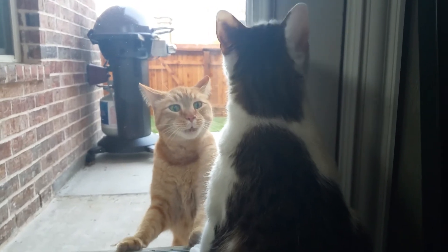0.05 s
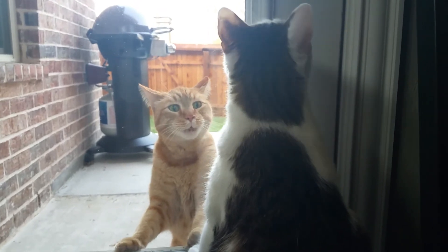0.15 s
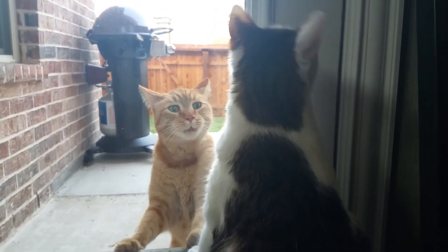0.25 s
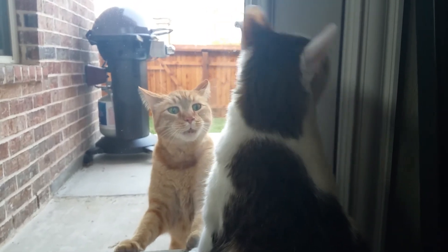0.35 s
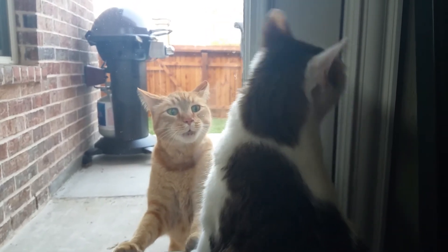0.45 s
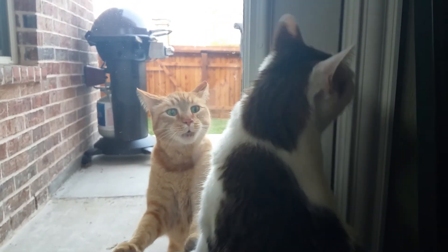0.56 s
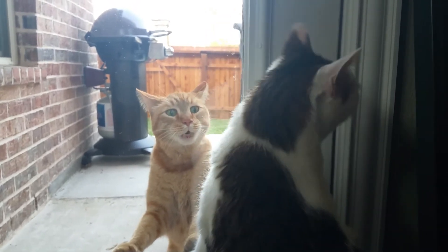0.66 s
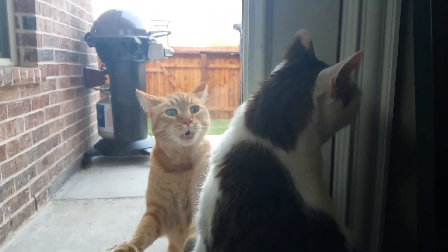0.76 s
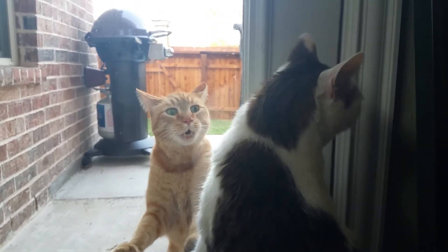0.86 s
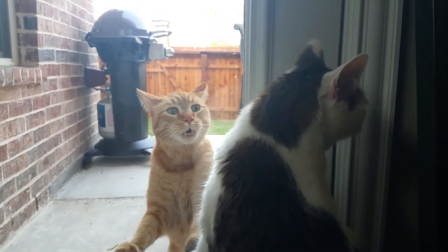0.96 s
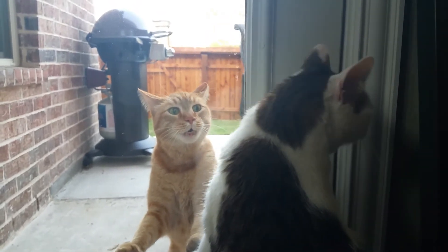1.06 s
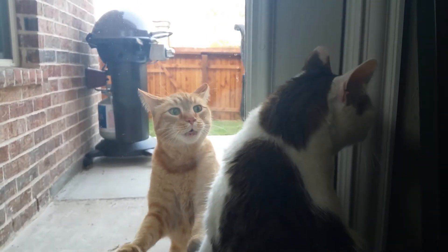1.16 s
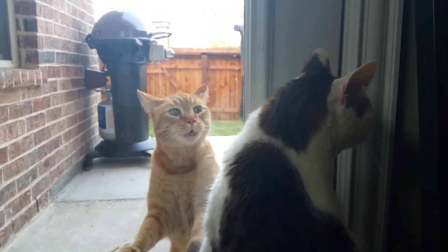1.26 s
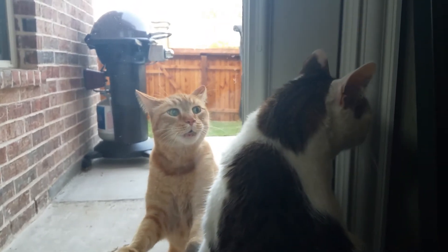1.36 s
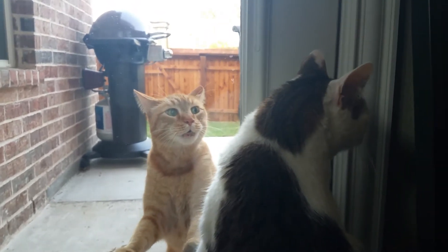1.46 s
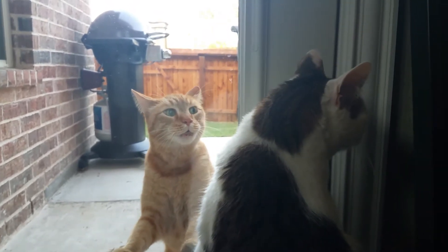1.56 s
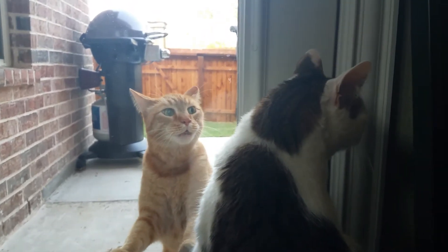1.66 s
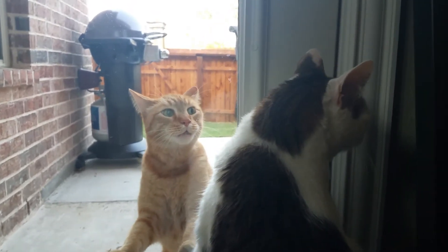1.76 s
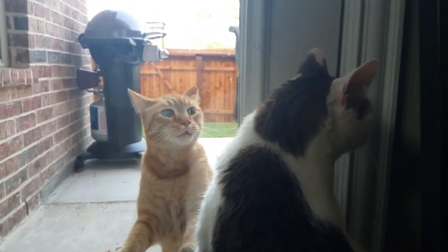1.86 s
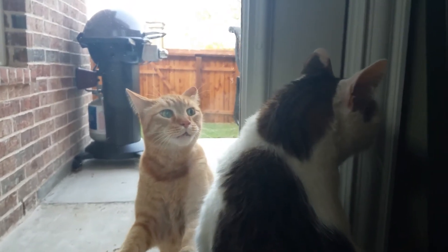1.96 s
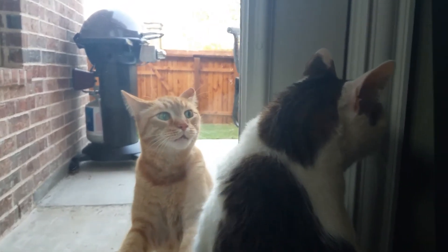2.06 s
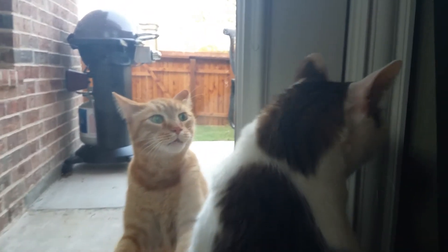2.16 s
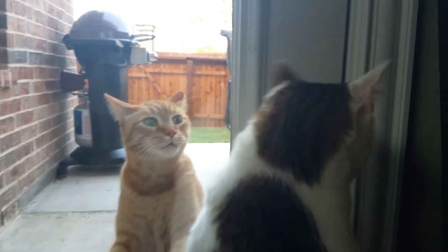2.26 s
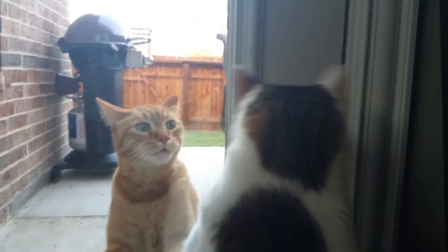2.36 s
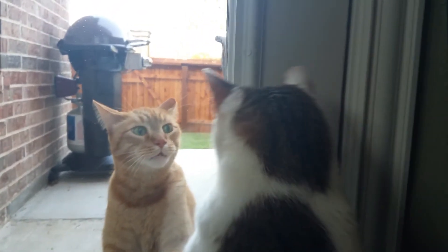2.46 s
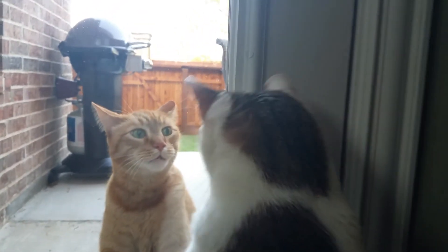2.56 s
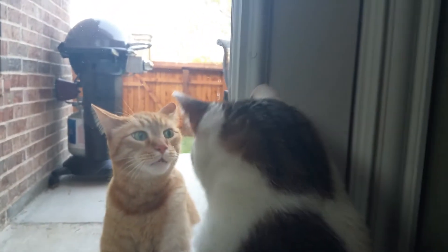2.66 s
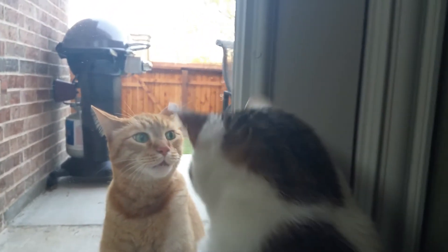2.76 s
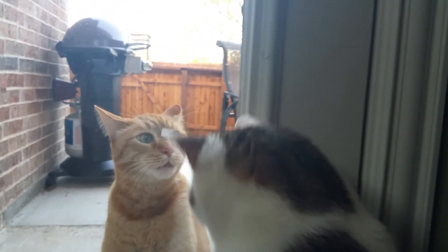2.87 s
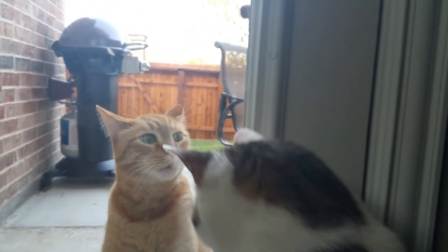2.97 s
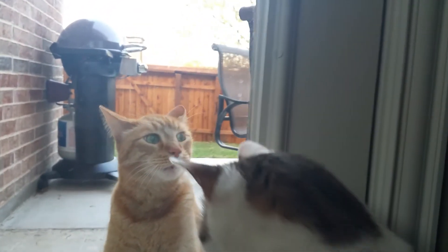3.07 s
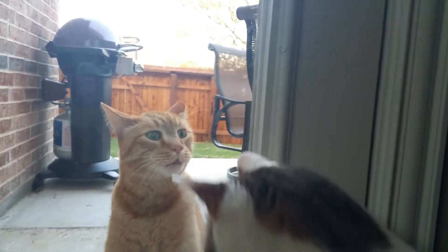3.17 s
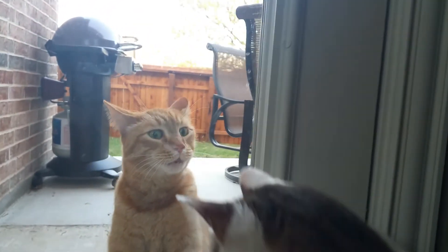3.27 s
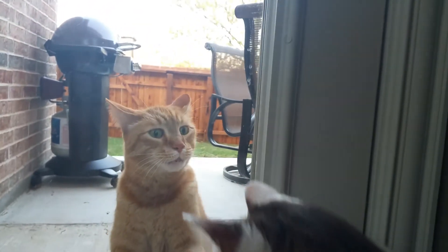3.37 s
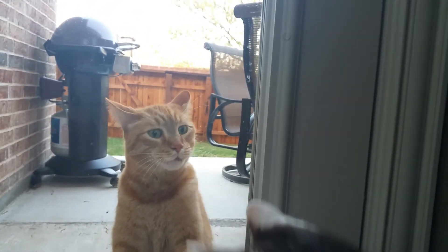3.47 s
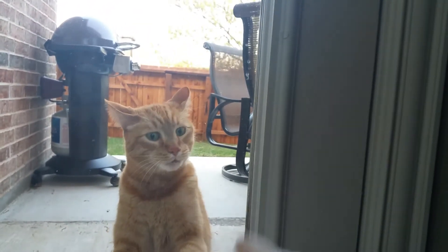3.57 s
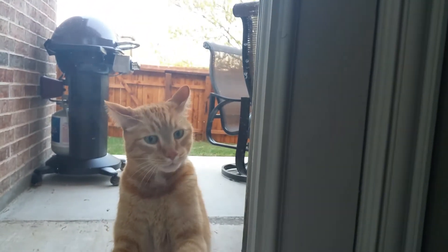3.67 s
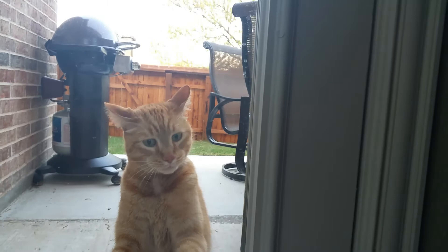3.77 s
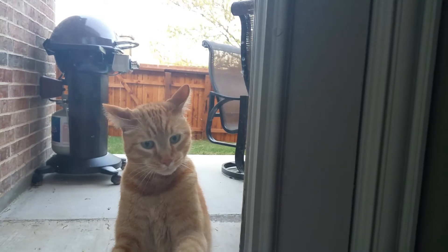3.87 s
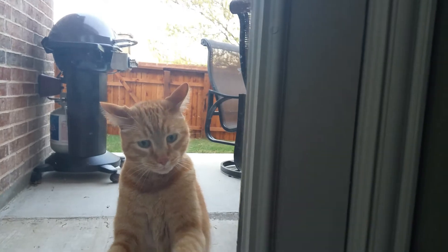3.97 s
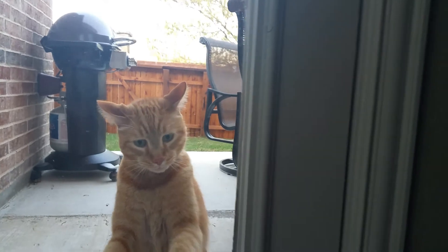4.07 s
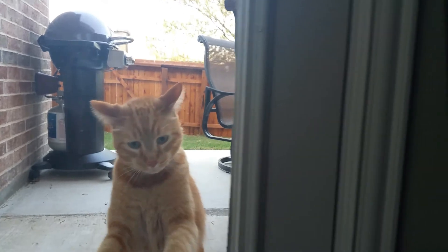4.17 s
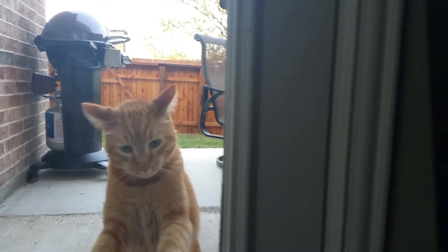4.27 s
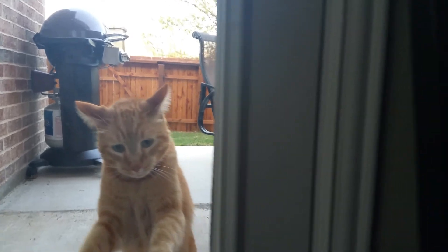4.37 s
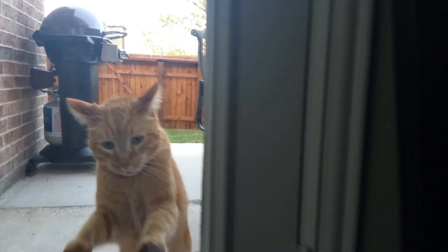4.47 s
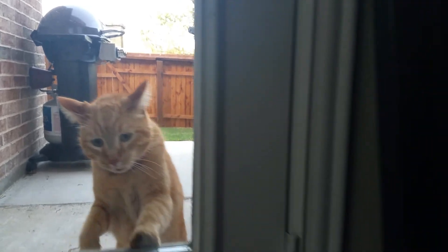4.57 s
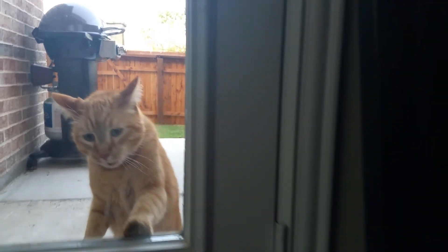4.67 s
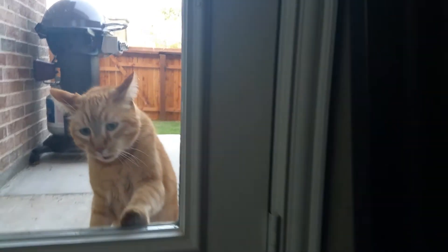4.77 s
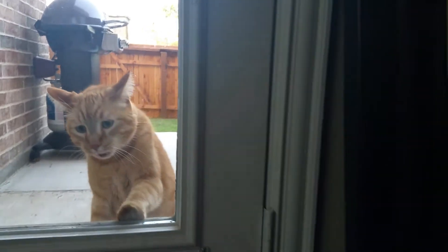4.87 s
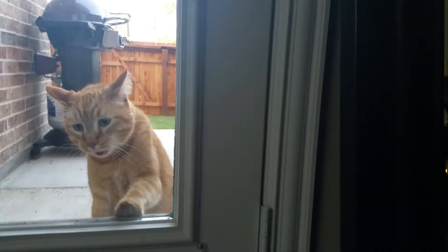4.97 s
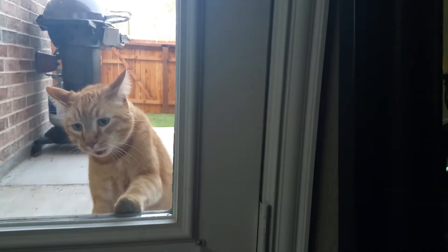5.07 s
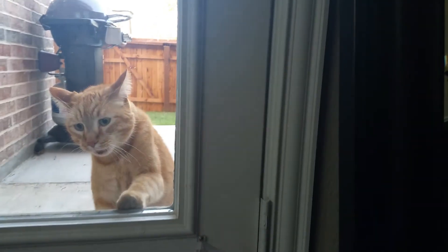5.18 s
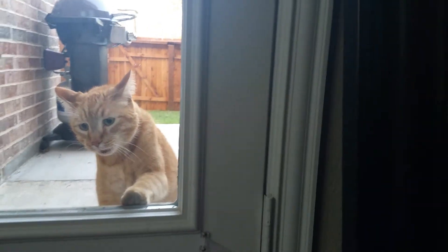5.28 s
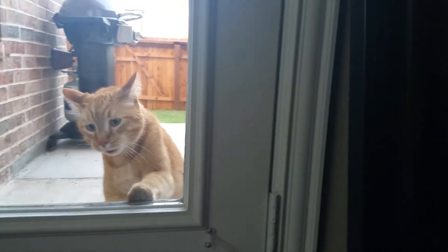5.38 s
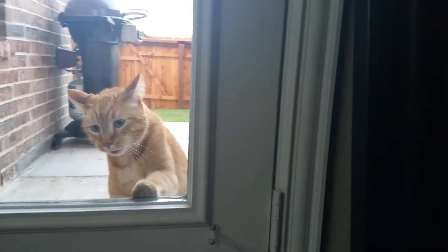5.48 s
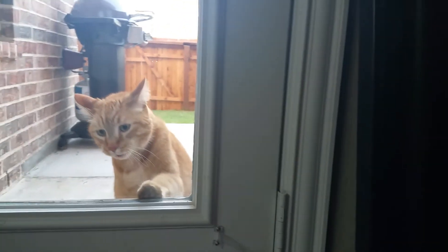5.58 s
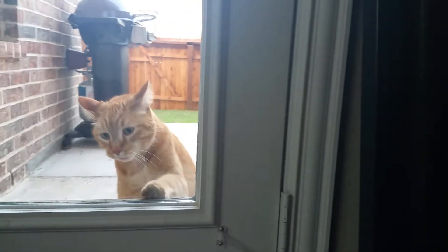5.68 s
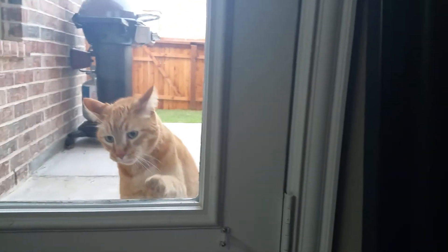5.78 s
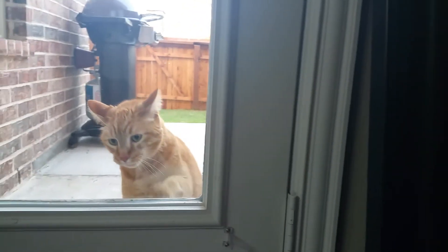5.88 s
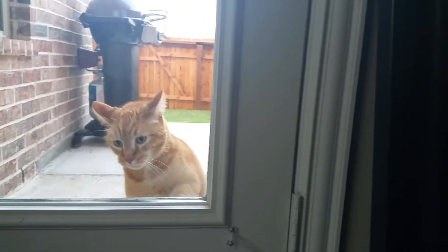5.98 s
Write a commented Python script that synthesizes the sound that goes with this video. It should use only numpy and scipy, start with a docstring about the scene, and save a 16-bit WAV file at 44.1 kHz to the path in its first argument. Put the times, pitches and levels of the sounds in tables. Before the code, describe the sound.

Heard from inside a quiet room, a cat yowls twice through a glass door. The first call is drawn out, starting hoarse, holding its pitch and then sliding down into a rasp. After a faint tick and a sharper one, the second call rises to a higher note and eases down. The room smears both calls slightly, and a low rumble and soft microphone hiss lie underneath.

```python
"""A cat gives two long, clean yowls behind a glass door: the pitch scoops up fast, holds and sags.
Its vocal folds sing a few partials, shaped by the throat and raspy in the scoop or when slack.
Pane and room colour the glides and smear them. Two small ticks and a few soft noise bursts sit
underneath, on a bed of low house rumble and the hiss of a pair of microphones."""
import sys
import numpy as np
from scipy import signal
from scipy.io import wavfile
from scipy.ndimage import uniform_filter1d

SR = 44100
rng = np.random.default_rng(int(sys.argv[2]) if len(sys.argv) > 2 else 0)


def generate_wav(signal):
    """Clip the signal to [-1, 1] and save it as 16-bit WAV at the path in sys.argv[1]."""
    frames = np.transpose(np.atleast_2d(signal))
    scaled = np.clip(frames, -1, 1) * 32767
    pcm = np.round(scaled).astype(np.int16)
    wavfile.write(sys.argv[1], SR, pcm)


N = 265923

# the performance, per yowl: t/s, held pitch/Hz, effort/dB, mouth (scales formants), tilt/(dB/octave)
YOWLS = [
    [(0.0, 405, -49, 0.67, -3), (0.12, 396.8, -42.5, 0.9, 1), (0.27, 380.7, -40.5, 0.9, 4.5),
     (0.43, 403.5, -40.5, 1.093, -2), (0.64, 396.5, -42.5, 0.96, 6), (0.81, 391.8, -37.5, 0.95, 2.5),
     (0.96, 410.2, -34, 0.97, 3), (1.09, 413.8, -34, 0.9, 0.5), (1.14, 424.6, -36.5, 0.96, -0.5),
     (1.31, 420.9, -38, 1, 5.5), (1.5, 408.9, -31, 1.068, -3), (1.72, 390, -40, 1.06, -0.5),
     (2.1, 352, -42, 0.94, -0.5), (2.33, 338.7, -37.5, 0.96, -6), (2.57, 305.9, -42, 1.13, -8.5),
     (2.94, 301.4, -39, 1.077, -2), (3.29, 292.9, -39.5, 0.96, 2), (3.42, 272.4, -37.5, 0.9, -5),
     (3.58, 228, -45.5, 0.68, -2), (3.62, 208, -52, 0.39, -5.9)],
    [(4.33, 417.9, -52.5, 0.75, 3), (4.42, 443.8, -38.5, 0.966, 1), (4.52, 485.3, -39.5, 0.83, 5.5),
     (4.63, 478, -30.5, 0.99, 1.3), (4.73, 485.8, -36.5, 1.003, 9.5), (4.96, 486.7, -36, 0.96, 10),
     (5.2, 481.5, -32.5, 0.97, 8.5), (5.42, 450.7, -29.5, 0.91, 0.5), (5.555, 437.5, -34, 0.92, 2.2),
     (5.61, 442, -35, 0.96, 0.5), (5.86, 421, -37.5, 1.11, -1), (5.96, 407.8, -40, 1.24, -11.5),
     (6.03, 390.4, -27, 0.95, -2)],
]
# stereo placement, per yowl: f/Hz, left minus right/dB, left phase lead/rad
YOWL_PANS = [
    [(300, 0.5, 0.12), (800, -4.5, 0.78), (1250, -3, -1.23), (1470, 1, -1.4), (1627, -0.5, 0.8),
     (1755, -24, 0.24), (2100, -3, .2)],
    [(400, 0.5, .1), (1000, 1, 0.46), (1300, -16.5, 0.44), (1470, -11, 1.5), (1700, -9, -.3),
     (1930, -18, 1.3), (2300, -2.5, 1.4)],
]
# partials 1 to 5 at the vocal folds: level/dB
FOLD_LEVELS = [-4.5, 0, -14, -17.5, -30]
# throat resonances: f/Hz, width/Hz, level/dB
FORMANTS = [(960, 86.5, -0.0), (1780, 96.7, 7.5)]
# resonances that pick out partials 6 to 9: f/Hz, width/Hz, level/dB
HIGH_FORMANTS = [(1900, 710, 1.5), (2854, 410, -7), (3390, 390, -4), (4065, 450, -6)]
# one partial glints or dips for a moment: t/s, partial, length/s, level/dB
GLINTS = [(0.163, 2, 0.11, -3.5), (.2, 4, 0.22, 5), (0.237, 5, 0.32, -19), (0.307, 2, .015, -6),
          (0.424, 2, 0.12, -8), (0.85, 2, 0.018, -12), (1.15, 8, 0.17, 12), (1.118, 2, 0.056, 6),
          (1.144, 2, 0.018, -6.5), (1.188, 2, 0.042, -7), (1.5, 9, 0.24, 16), (2.417, 3, 0.12, -16),
          (2.478, 2, 0.045, -7), (2.551, 2, 0.096, 10), (2.61, 2, 0.02, -22), (2.65, 6, .5, -18),
          (2.803, 2, .35, 5), (3.345, 3, 0.032, -23), (3.42, 5, 0.75, -3), (3.485, 3, 0.16, 5),
          (4.413, 3, 0.096, 8), (4.432, 2, 0.063, -14), (4.58, 4, 0.02, -17.5), (4.624, 3, 0.071, -8.5),
          (4.739, 2, .015, -17), (5.13, 1, 0.3, -13), (5.101, 7, 0.53, -8.5), (5.299, 6, .8, 5),
          (5.368, 2, .015, -16.5), (5.55, 9, .4, 9), (5.706, 2, 0.14, -5)]
# peaks and notches from pane and room: f/Hz, width/Hz, level/dB
PANE_COLOUR = [(361.7, 21.0, 13), (519, 35.0, -15), (637, 29, -8.5), (771, 43, 5), (794.6, 8.0, -10.5),
               (809.2, 14.0, -5), (838.6, 33, 3), (845, 7.3, -11), (926.4, 10.0, 2.5), (1091, 23, 7),
               (1457, 64.0, 8), (1609, 54, 10), (2210, 41, 9.5)]
# tick hits: t/s, peak level/dB, left minus right/dB
TICK_HITS = [(3.865, -52.5, -13), (4.07, -37.5, -8)]
# ring of the ticked part: f/Hz, level/dB, t60/s
TICK_RING = [(1900, -0.5, .010), (2570, 0.5, 0.015), (3250, 1, 0.011), (6750, -13.5, 0.0078)]
# short noise bursts: t/s, length/s (the tail runs as long again), low f/Hz, high f/Hz, level/dB
SOFT_NOISES = [(.29, 0.16, 422, 680, -54), (3.257, .03, 1200, 1900, -59.5),
               (3.29, 0.094, 1300, 1900, -60.5), (3.288, .16, 6200, 8500, -68),
               (3.867, .016, 110, 800, -52.5), (3.95, 0.21, 1800, 2100, -64)]
# reverb decay: f/Hz, t60/s
REVERB_DECAY = [(300, 0.7), (1200, 0.45), (4000, 0.27)]
# reverb width: f/Hz, left-right correlation
REVERB_IMAGE = [(300, 0.92), (900, 0.8), (1500, 0.15)]
# standing waves: f/Hz, width/Hz, level/dB
ROOM_MODES = [(482.3, 18, 1), (836.5, 9.9, -2.5), (932, 10, -5)]
# rumble tone: f/Hz, relative level/dB
RUMBLE_EQ = [(30, -29.5), (50, -6), (75, 0), (125, -5), (165, -11.5), (250, -9), (450, -17), (700, -21.5),
             (1300, -24.5), (2200, -29), (3500, -42)]
# rumble fader: t/s, level/dB
RUMBLE_RIDE = [(0, -0.5), (1, 1.5), (3.2, 1.5), (4.1, -1), (5.2, 2.5), (6.03, 3.5)]
# rumble width: f/Hz, left-right correlation
RUMBLE_IMAGE = [(60, 1), (130, 0.9), (290, .75), (640, 0.31), (1400, .05)]
# hiss tone: f/Hz, relative level/dB
HISS_EQ = [(1500, -12), (2500, -3), (4700, -3.5), (5400, 3.5), (6250, -12), (9700, -16.5), (11100, -1),
           (12500, -8.5), (16000, -7.5)]
# hiss placement: f/Hz, left minus right/dB
HISS_PAN = [(2500, 1), (8000, -7.5), (13000, -6)]

SCOOP_HZ, SCOOP_S, SCOOP_SHAPE = 244.4, (.16, .19), 1.54  # start below pitch, time per yowl, curve
WAVER, SLACK_HZ = 0.0016, 331.3  # relative pitch tremble; the folds go slack below this pitch
BREATH_DB, BREATH_HZ, RASP = -39, 119, 0.19  # air round each partial; rasp depth per octave of slack
LEAK_DB, LEAK_HZ = -19, (300, 1510)  # hoarse air: level relative to effort, band
FLUTTER_DB, FLUTTER_SLACK_DB = (1.7, 0.6, 1.2, 1.2, 2.5), 0.7  # partials 1 to 5; extra per slack octave
HIGH_DB, HIGH_SHARE, HIGH_SLACK_DB = -62, 0.55, 26.5  # base, share of effort, lift per slack octave
REVERB_DB, RUMBLE_DB, HISS_DB = -10, -59.5, -74.5
HOP = 128  # samples per envelope step


def yowl(voice, scoop_s, pan):
    """Steady vocal folds give clean partials with a halo of breath, raspy when slack or scooping up."""
    times, held_hz, effort_db, _, _ = np.transpose(voice)
    t = np.arange(times[0], times[-1], 1 / SR)
    scoop = np.exp(-((t - times[0]) / scoop_s) ** SCOOP_SHAPE)
    glide_hz = np.interp(t, times, held_hz) - SCOOP_HZ * scoop
    leak = air_leak(scoop, np.interp(t, times, effort_db))
    pitch_hz = glide_hz * (1 + WAVER * drift(len(t), 11))
    fundamental = np.exp(2j * np.pi * np.cumsum(pitch_hz) / SR)
    slack = slackness(pitch_hz)
    step_hz = glide_hz[::HOP]
    tone = np.zeros((2, len(t)))
    for k, gain in enumerate(partial_gains(voice, t, step_hz, slack[::HOP]), 1):
        left = amp(curve(pan, k * step_hz) / 2) * np.exp(.5j * curve(pan, k * step_hz, col=2))
        gain = 2 * gain / abs(left + 1 / left)  # panning keeps the mono level
        partial = fundamental ** k * np.exp(2j * np.pi * rng.random())
        tone += [(np.interp(t, t[::HOP], gain * side) * partial).real for side in (left, 1 / left)]
    roughness = amp(BREATH_DB) + RASP * (slack + scoop)
    breath = 1 + roughness * drift(len(t), BREATH_HZ)
    fade = np.minimum(np.minimum(t - times[0], times[-1] - t) * 30, 1)
    return (np.sqrt(2) * tone * breath + leak) * fade


def partial_gains(voice, t, pitch_hz, slack):
    """Throat and pane shape partials 1 to 5; the faint partials 6 to 9 flicker on top."""
    times, *lanes = np.transpose(voice)
    steps = t[::HOP]
    stride = len(t) // len(steps) + 1
    held_hz, effort_db, mouth, tilt_db = (np.interp(steps, times, lane) for lane in lanes)
    gains = []
    for k, (fold_db, wobble_db) in enumerate(zip(FOLD_LEVELS, FLUTTER_DB), 1):
        hz = k * pitch_hz
        source_db = effort_db + fold_db + tilt_db * np.log2(k / 2)
        throat_power = sum(amp(db) ** 2 * bell(hz, f * mouth, width) for f, width, db in FORMANTS)
        flutter_db = (wobble_db + FLUTTER_SLACK_DB * slack) * drift(len(t), 18.3)[::stride]
        gains.append(np.sqrt(throat_power) * amp(source_db + pane(hz) + flutter_db + glints(steps, k)))
    brightness = amp(HIGH_DB + HIGH_SHARE * effort_db + HIGH_SLACK_DB * slackness(held_hz))
    for k in range(6, 10):
        flicker = amp(3 * drift(len(t), 6.9)[::stride] + glints(steps, k))
        resonance = sum(amp(db) * bell(k * pitch_hz, f, width) ** 2 for f, width, db in HIGH_FORMANTS)
        gains.append(brightness * flicker * resonance)
    return gains


def slackness(pitch_hz):
    """How slack the folds are, in octaves below SLACK_HZ."""
    return np.maximum(np.log2(SLACK_HZ / pitch_hz), 0)


def air_leak(scoop, effort_db):
    """Air slipping past the folds makes the scoop hoarse."""
    band = signal.butter(4, LEAK_HZ, "bandpass", fs=SR, output="sos")
    air = unit_rms(signal.sosfilt(band, rng.standard_normal((2, len(scoop)))))
    return air * scoop * amp(LEAK_DB + effort_db)


def glints(t, k):
    """Brief lifts and dips of partial k, in dB."""
    return sum(db * np.exp(-(2 * (t - at) / length) ** 2)
               for at, partial, length, db in GLINTS if partial == k)


def pane(hz):
    """Pane and room boost or notch a passing partial, in dB; smoothed, as narrow peaks act slowly."""
    return uniform_filter1d(sum(db * bell(hz, f, width) for f, width, db in PANE_COLOUR), size=15)


def ticks():
    """A claw or latch ticks a small hard part that rings for a few milliseconds."""
    out, t = np.zeros((2, N)), np.arange(1500) / SR
    ring = sum(amp(db - 60 * t / t60) * np.sin(2 * np.pi * hz * t) for hz, db, t60 in TICK_RING)
    ring *= np.minimum(t * 1300, 1) ** 2  # contact builds in just under a millisecond
    for start, db, pan_db in TICK_HITS:
        add(out, start, amp(db + np.array([[pan_db], [-pan_db]]) / 2) * ring / abs(ring).max())
    return out


def soft_noises():
    """Short noise bursts: a low rasp, faint rustles, a dull thump and a thin squeak."""
    out = np.zeros((2, N))
    for start, length, low_hz, high_hz, db in SOFT_NOISES:
        age = np.arange(round(2 * length * SR)) / (length * SR)
        band = signal.butter(3, [low_hz, high_hz], "bandpass", fs=SR, output="sos")
        burst = unit_rms(signal.sosfilt(band, rng.standard_normal((2, SR // 2)))[:, :len(age)])
        add(out, start, amp(db) * burst * np.minimum(age * 14, 1) * np.exp(-2 * age))
    return out


def room_reverb(mono):
    """Sparse reflections smear the glides: long, centred lows and short, wide highs."""
    taps = np.zeros((2, SR // 2))
    arrivals = np.arange(300, SR // 2 - 20, 20) + rng.integers(0, 20, (2, (SR // 2 - 301) // 20))
    np.put_along_axis(taps, arrivals, rng.choice([-1., 1.], arrivals.shape), 1)
    hz, t, bands = signal.stft(taps, SR, nperseg=256)
    bands[1] = correlated(*bands, curve(REVERB_IMAGE, hz))
    decay = amp(-60 * t / curve(REVERB_DECAY, hz)[:, None])
    tail = signal.istft(bands * decay, SR, nperseg=256)[1]
    return signal.fftconvolve(mono[None], tail / np.linalg.norm(tail[0]), axes=1)[:, :N]


def standing_waves(mono):
    """Narrow room modes ring on as a partial glides past."""
    return sum(amp(db) * signal.lfilter(*signal.iirpeak(hz, hz / width, SR), mono)
               for hz, width, db in ROOM_MODES)


def house_rumble():
    """The low bed of the house, slowly swelling and easing."""
    ride_db = np.interp(np.arange(N) / SR, *np.transpose(RUMBLE_RIDE))
    bed = noise_bed(RUMBLE_EQ, RUMBLE_IMAGE, pan=[(100, 0), (2000, -0.66)], shimmer_db=0.98)
    return amp(RUMBLE_DB + ride_db) * bed


def noise_bed(eq, image, pan, shimmer_db):
    """Shaped stereo noise whose bands drift in level; its mono mix has rms 1."""
    frames, hz = N // 512 + 5, np.fft.rfftfreq(2048, 1 / SR)
    left_re, left_im, other_re, other_im, shimmer = rng.standard_normal((frames, len(hz), 5)).T
    shimmer = unit_rms(uniform_filter1d(uniform_filter1d(shimmer, size=20, axis=0), size=8, axis=1))
    left = left_re + 1j * left_im
    bands = np.array([left, correlated(left, other_re + 1j * other_im, curve(image, hz))])
    side_db = curve(pan, hz) / 2
    bands *= amp(curve(eq, hz) + np.array([side_db, -side_db]))[..., None] * amp(shimmer_db * shimmer)
    out = signal.istft(bands, nperseg=2048, noverlap=1536)[1][:, :N]
    return out / np.sqrt(np.mean(out.mean(0) ** 2))


def correlated(left, other, correlation):
    share = correlation[:, None]
    return share * left + np.sqrt(1 - share ** 2) * other


def amp(db):
    """Decibels to gain."""
    return 10 ** (np.asarray(db) / 20)


def unit_rms(x):
    """Scales to rms 1."""
    return x / np.sqrt(np.mean(x ** 2) + 1e-20)


def bell(hz, centre, width):
    """Resonance curve with a peak of 1."""
    return 1 / (1 + (2 * (hz - centre) / width) ** 2)


def curve(points, hz, col=1):
    """Reads a table column along log frequency."""
    table = np.transpose(points)
    return np.interp(np.log(hz + 1), np.log(table[0] + 1), table[col])


def drift(count, hz):
    """Random modulator: noise low-passed at hz, rms 1."""
    return unit_rms(signal.sosfilt(signal.butter(2, hz, fs=SR, output="sos"), rng.standard_normal(count)))


def add(mix, start, sound):
    """Mixes in a stereo sound at start seconds."""
    part = mix[:, round(start * SR):][:, :sound.shape[1]]
    part += sound[:, :part.shape[1]]


def scene():
    """Yowls and ticks feed the room; soft noises and rumble stay dry."""
    direct = ticks()
    for voice, scoop_s, pan in zip(YOWLS, SCOOP_S, YOWL_PANS):
        add(direct, voice[0][0], yowl(voice, scoop_s, pan))
    rumble = house_rumble()
    send = direct.mean(0)
    return direct + amp(REVERB_DB) * room_reverb(send) + standing_waves(send) + soft_noises() + rumble


def record(dry):
    """Each microphone adds its own hiss; a steep low-pass trims the very top."""
    hiss = amp(HISS_DB) * noise_bed(HISS_EQ, image=[(0, 0)], pan=HISS_PAN, shimmer_db=1.5)
    lowpass = signal.firwin(1023, cutoff=15750, window=("kaiser", 9), fs=SR)
    return signal.oaconvolve(dry + hiss, lowpass[None], "same")


dry = scene()
out = record(dry)
generate_wav(out)
```